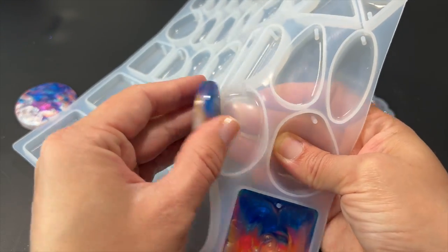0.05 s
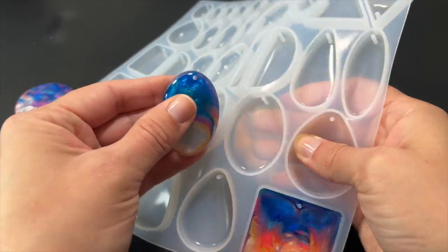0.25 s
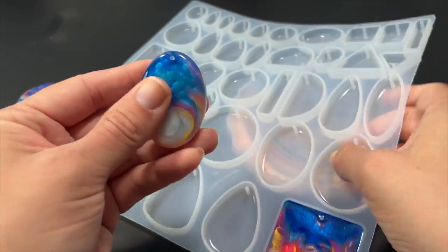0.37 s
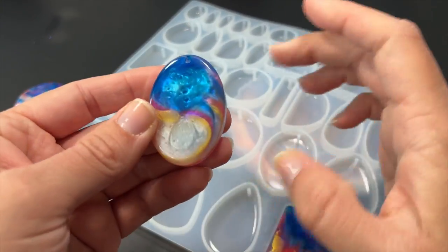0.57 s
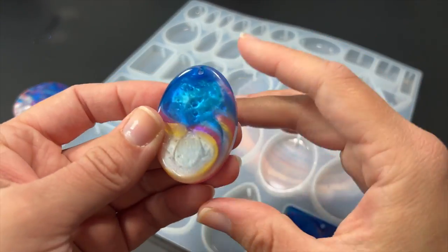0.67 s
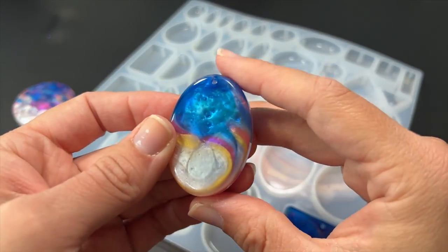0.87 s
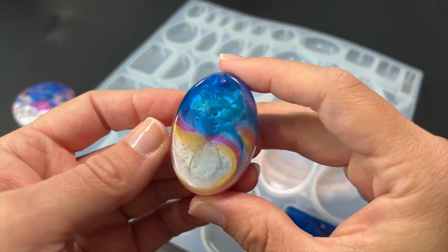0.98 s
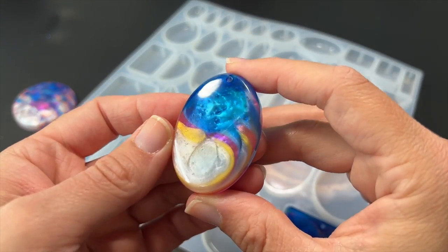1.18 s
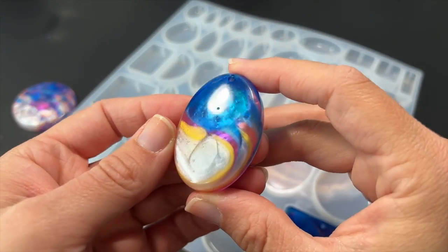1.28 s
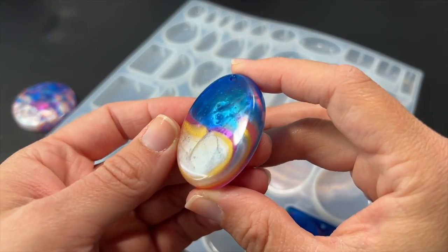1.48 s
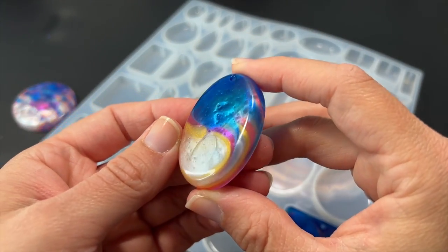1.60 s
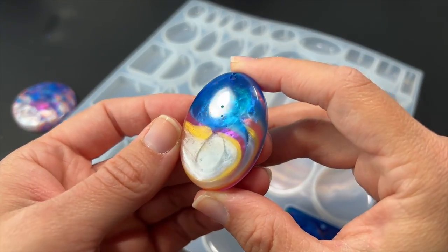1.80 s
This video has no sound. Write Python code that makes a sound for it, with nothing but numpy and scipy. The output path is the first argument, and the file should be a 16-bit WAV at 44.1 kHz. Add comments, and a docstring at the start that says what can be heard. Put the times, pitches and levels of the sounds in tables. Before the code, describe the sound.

A hard resin piece pops out of a silicone mold, followed by soft rubbery handling.

```python
"""Resin egg popping out of a silicone mold

Close up, stretched rubber rasps off a cast resin egg and lets go with one hollow pop: the seal cracks
and a gulp of air rings the cavity. The loose mold wobbles, slides over the fingers and flops onto the
table. A fingernail touches the resin; the small room hums faintly."""
import sys
import numpy as np
from scipy import signal
from scipy.fft import rfft, irfft
from scipy.io import wavfile

SR = 44100
rng = np.random.default_rng(int(sys.argv[2]) if len(sys.argv) > 2 else 0)


def transcribe(u):
    """Save the signal u as a 16-bit wav file named by the first command-line argument.

    u: samples, shape (n,) or (channels, n), limited to [-1, 1]; the rate is SR.
    q: integer samples, one column per channel.
    """
    v = np.clip(np.atleast_2d(u).T, -1, 1)
    q = np.round(v * 32767).astype(np.int16)
    wavfile.write(sys.argv[1], SR, q)


N = 81585
POP_S, SHARP_RISE_S = 0.055, 0.00025


def amp(db):
    """Decibels to gain."""
    return 10 ** (np.asarray(db) / 20)


def unit(x):
    """Scales to rms 1."""
    return x / np.sqrt(np.mean(x ** 2) + 1e-20)


def read(points, hz):
    """Reads a curve on a log-frequency axis."""
    freq_hz, value = np.transpose(points)
    return np.interp(np.log(hz + 1), np.log(freq_hz + 1), value)


def add(mix, start_s, sound):
    """Mixes a sound in at start_s."""
    part = mix[max(round(start_s * SR), 0):][:len(sound)]
    part += sound[:len(part)]


def click(spectrum, size=4096):
    """A minimum-phase impulse with the given spectrum, peak 1."""
    log_gain = np.log(amp(read(spectrum, abs(np.fft.fftfreq(size, 1 / SR)))))
    response = np.exp(np.conj(signal.hilbert(log_gain)))
    impulse = np.fft.ifft(response).real[:size // 2]
    return impulse / abs(impulse).max()


def colour(x, spectrum):
    """Shapes a steady sound with an EQ curve, at rms 1."""
    gain = amp(read(spectrum, np.fft.rfftfreq(len(x), 1 / SR)))
    return unit(irfft(rfft(x) * gain, len(x)))


def slips(spectrum, per_s=7800, spread_db=2):
    """Friction texture: dense, tiny stick-slip clicks of uneven size."""
    size = amp(spread_db * np.minimum(rng.exponential(1, N), np.pi)) * rng.standard_normal(N)
    slipping = rng.random(N) < per_s / SR
    return colour(size * slipping, spectrum)


def ring(t, rise_s, t60_s):
    """Envelope with a linear attack and an exponential decay."""
    return np.clip(t / rise_s, 0, 1) * np.exp(-np.log(1000) * np.maximum(t, 0) / t60_s)


def modes(t, table):
    """Damped modes of alternating sign, struck at t = 0."""
    t = np.maximum(t, 0)
    return sum((-1) ** (k + 1) * amp(db) * np.exp(-np.log(1000) * t / t60) * np.sin(2 * np.pi * hz * t)
               for k, (hz, db, t60) in enumerate(table))


def room_tone(air_db=-68.5):
    """A bed of still room air and mains hum."""
    # rumbling air: freq_hz, gain_db
    air_spectrum = [(10, -3), (28, 1.5), (50, -12.5), (90, -20.5), (140, -16.5), (220, -20.5), (500, -23.5),
                    (1000, -26.5), (2500, -31.5), (8000, -34.5), (16000, -35.5)]
    # mains hum and its octave: pitch_hz, rms_db
    hum_partials = [(59.6, -72), (119.5, -78)]
    t = np.arange(N) / SR
    hum = sum(amp(db) * unit(np.sin(2 * np.pi * (hz * t + rng.random()))) for hz, db in hum_partials)
    return amp(air_db) * colour(rng.standard_normal(N), air_spectrum) + hum


def room_reverb(x, wet_db=-16, predelay_s=0.007):
    """The small room's short, diffuse tail; the bass lingers longest."""
    # room decay: freq_hz, t60_s
    decay_times = [(100, 0.36), (500, 0.084), (1300, .125), (4000, 0.11), (16000, .11)]
    hz, t, noise = signal.stft(rng.standard_normal(SR // 2), SR, nperseg=256)
    decay = np.exp(-np.log(1000) * t / read(decay_times, hz)[:, None])
    tail = signal.istft(noise * decay, SR)[1]
    wet = np.zeros(N)
    add(wet, predelay_s, signal.fftconvolve(x, tail / np.linalg.norm(tail)))
    return amp(wet_db) * wet


def grip():
    """A dull rustle of skin that dies away as the hands come to rest."""
    # the hands shifting their grip: time_s, level_db
    level_curve = [(0, -59.5), (.2, -69.5), (.35, -60), (0.549, -70.5), (.78, -68), (1.001, -77.5),
                   (1.85, -86.5)]
    # skin rustle: freq_hz, gain_db
    skin_spectrum = [(30, 3), (100, -5), (200, -17), (450, -15.5), (800, -24.5), (3000, -42.5)]
    level_db = np.interp(np.arange(N) / SR, *np.transpose(level_curve))
    return amp(level_db) * slips(skin_spectrum)


def rubs(fall_db=-30.5):
    """Skin and resin stroke the rubber; their slips sound the hollow mold and a fine hiss."""
    # strokes, each fading by fall_db over fall_s: start_s, rise_s, fall_s, body_db, hiss_db
    strokes = [(0.056, 0.0066, 0.048, -56.5, -58.5), (0.246, 0.012, 0.073, -57, -71),
               (0.269, 0.043, 0.11, -60.5, -70), (0.304, 0.047, 0.24, -55.5, -62),
               (0.405, 0.024, 0.045, -65, -71), (0.48, .011, 0.042, -48, -67.5),
               (0.719, 0.053, .16, -72.5, -86), (.859, .03, 0.067, -75, -98)]
    # the hollow mold: freq_hz, gain_db
    body_spectrum = [(100, -13), (300, -10.5), (560, -15), (800, -2), (1050, -7), (1320, 3), (1600, -12.5),
                     (3000, -17), (8000, -42)]
    # surface hiss: freq_hz, gain_db
    hiss_spectrum = [(500, -30.5), (1800, -3.5), (2700, -5), (4000, -0.5), (5500, 1), (9000, -5.5),
                     (16000, -14)]
    t, body_power, hiss_power = np.arange(N) / SR, np.zeros(N), np.zeros(N)
    for start_s, rise_s, fall_s, body_db, hiss_db in strokes:
        swell = np.clip((t - start_s) / rise_s, 0, 1)
        stroke = swell * amp(fall_db * np.maximum(t - start_s - rise_s, 0) / fall_s)
        body_power += (amp(body_db) * stroke) ** 2
        hiss_power += (amp(hiss_db) * stroke) ** 2
    return np.sqrt(body_power) * slips(body_spectrum) + np.sqrt(hiss_power) * slips(hiss_spectrum)


def ticks(nail_s=0.96):
    """Short, bright crackles where tacky rubber or a nail meets the resin."""
    # sticky ticks and nail taps: start_s, level_db, t60_s, lowpass_hz
    contacts = [(0.037, -52.5, 0.041, 14600), (0.049, -53, 0.027, 12300), (0.1365, -62.5, 0.062, 14000),
                (0.1544, -57.5, 0.061, 9200), (0.427, -53, 0.023, 12000), (.451, -44.5, 0.025, 5340),
                (0.487, -54, 0.012, 12000), (0.4905, -47, 0.02, 8600), (0.956, -55.5, 0.079, 4800)]
    # tick brightness: freq_hz, gain_db
    tick_spectrum = [(200, -21), (1300, -4.5), (2500, -8), (4000, -5), (5000, -3), (8000, -7.5),
                     (16000, -4)]
    # resin ringing under the fingernail: pitch_hz, level_db, t60_s
    resin_modes = [(2890, -68, .06), (3820, -65, 0.042)]
    t, crackle = np.arange(N) / SR, np.zeros(N)
    grain = colour(rng.standard_normal(N), tick_spectrum)
    for start_s, level_db, t60_s, lowpass_hz in contacts:
        burst = grain * ring(t - start_s, SHARP_RISE_S, t60_s)
        crackle += amp(level_db) * signal.lfilter(*signal.butter(2, lowpass_hz, fs=SR), burst)
    return crackle + modes(t - nail_s, resin_modes)


def wobble():
    """The released rubber sheet swings and flexes at low, damped pitches."""
    # swings of the sheet: start_s, pitch_hz, level_db, rise_s, t60_s
    swings = [(.070, 138.3, -45, .008, .16), (.072, 85, -51, .009, .15), (.252, 760, -52.5, .007, .065),
              (.376, 74, -44.5, .007, .25), (.378, 425, -47, .002, .07), (.416, 92, -44, .004, .079),
              (.486, 40.2, -44.5, .008, .15), (.495, 120, -38, .003, .07), (.532, 20.5, -44, .045, .6),
              (.634, 66, -55.5, .008, .19)]
    t = np.arange(N) / SR
    return sum(amp(db) * ring(t - start_s, rise_s, t60_s) * np.sin(2 * np.pi * hz * (t - start_s))
               for start_s, hz, db, rise_s, t60_s in swings)


def slaps(highpass_hz=111):
    """Each slap is a soft push of air and a patter as the rubber settles."""
    # rubber landing on fingers and table: time_s, push_db, push_width_s, patter_db, patter_t60_s
    landings = [(0.074, -34, 0.00046, -43.5, 0.03), (.143, -47, 0.0012, -56.5, 0.13),
                (.155, -45, 0.0016, -59.5, 0.077), (0.375, -37, 0.00018, -44.5, 0.028),
                (0.3781, -33, 0.00024, -56, 0.022), (0.385, -31.5, 0.00055, -60, 0.089),
                (.388, -43, 0.0005, -52, 0.098), (0.428, -38.5, 0.00045, -46, 0.061),
                (0.4371, -35, 0.00062, -52.5, 0.085), (0.4806, -57, 0.00021, -53.5, 0.047),
                (0.4875, -35, 0.00011, -45.5, 0.049), (0.4924, -43.5, 0.00043, -49.5, .11)]
    # settling rubber: freq_hz, gain_db
    patter_spectrum = [(80, -21), (380, 0), (750, 1), (1200, -6), (1700, -17.5), (2400, -18), (4000, -33.5),
                       (16000, -50.5)]
    t, push, patter_power = np.arange(N) / SR, np.zeros(N), np.zeros(N)
    for time_s, push_db, width_s, patter_db, t60_s in landings:
        push -= amp(push_db) * np.exp(-0.5 * ((t - time_s) / width_s) ** 2)
        patter_power += (amp(patter_db) * ring(t - time_s, SHARP_RISE_S, t60_s)) ** 2
    thuds = signal.lfilter(*signal.butter(1, highpass_hz, "high", fs=SR), push)
    return thuds + np.sqrt(patter_power) * slips(patter_spectrum)


def peel(level_db=-48.5, t60_s=0.11):
    """The stretched rubber rasps off the resin, fading into the pop."""
    # creaking rubber: freq_hz, gain_db
    rasp_spectrum = [(200, -22.5), (550, -17), (850, 0.5), (1000, -12.5), (1200, -2.5), (2100, -15.5),
                     (2600, -3), (3600, -8.5), (5000, -17.5), (16000, -36.5)]
    return amp(level_db) * ring(np.arange(N) / SR, SHARP_RISE_S, t60_s) * slips(rasp_spectrum)


def pop():
    """The seal tears with a crack, a gulp of air rings the cavity, and the table reflects it all."""
    # the opened cavity, then the empty cups beside it ringing on faintly: pitch_hz, level_db, t60_s
    cavity_modes = [(674, -23.5, 0.019), (1336, -19.5, 0.02), (1624, -21.5, 0.0099), (727, -44, .05),
                    (851, -46, 0.063), (1104, -45, 0.054), (1534, -43.5, 0.096)]
    # the egg and the rim it snaps past: pitch_hz, level_db, t60_s
    rim_modes = [(2180, -47.5, .022), (2480, -40, 0.028), (4010, -32, 0.012), (4600, -26, 0.0032)]
    # the tearing seal: freq_hz, gain_db
    crack_spectrum = [(100, -25), (1000, -12.5), (3300, -4), (4300, 6), (7000, -0.5), (9500, 2),
                      (11500, -6.5), (13500, 0), (16000, -7.5)]
    gulp_db, gulp_s, cavity_lag_s = -19.5, 0.0008, 0.00023
    crack_db, tear_db, tear_t60_s = -22, -38.5, 0.018
    echo_s, body_echo_db, crack_echo_db = 0.00458, -15.5, -12
    t, mix = np.arange(SR // 4) / SR, np.zeros(N)
    gulp = amp(gulp_db) * np.sin(2 * np.pi * np.minimum(t / gulp_s, 1))  # one push and pull of air
    tear_noise = colour(rng.standard_normal(len(t)), crack_spectrum)
    tear = amp(tear_db) * ring(t, SHARP_RISE_S, tear_t60_s) * tear_noise
    body = gulp + tear + modes(t - cavity_lag_s, cavity_modes) + modes(t, rim_modes)
    crack = -amp(crack_db) * click(crack_spectrum)
    add(mix, POP_S, body)
    add(mix, POP_S, crack)
    add(mix, POP_S + echo_s, amp(body_echo_db) * body)
    add(mix, POP_S + echo_s, amp(crack_echo_db) * crack)
    return mix


def scene():
    """Mold and hands in mono over the room tone; only the wobble gets no reverb."""
    close = peel() + pop() + slaps() + ticks() + rubs() + grip()
    return (close + wobble() + room_reverb(close) + room_tone())[None]


def record(dry, cutoff_hz=15900):
    """A steep low-pass trims the very top of the treble."""
    lowpass = signal.firwin(511, cutoff_hz, window=("kaiser", 8), fs=SR)
    return signal.oaconvolve(dry, lowpass[None], "same")


dry = scene()
out = record(dry)
transcribe(out)
```